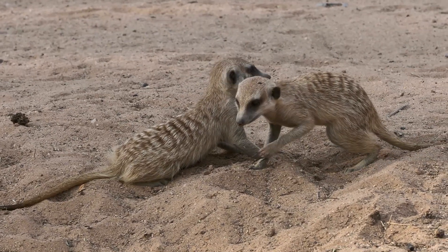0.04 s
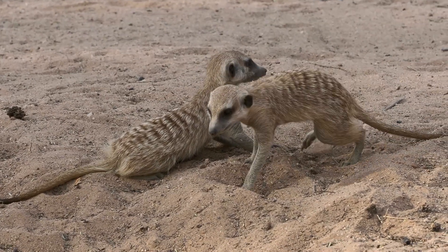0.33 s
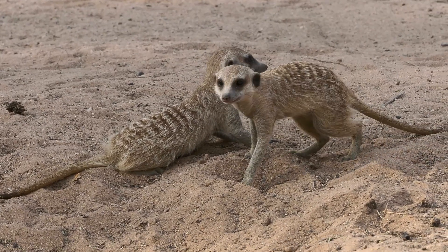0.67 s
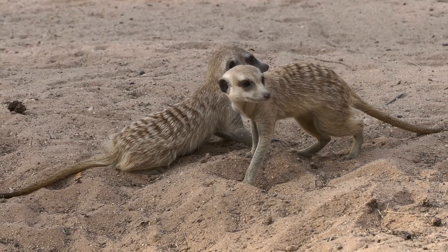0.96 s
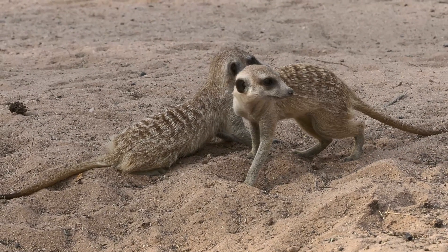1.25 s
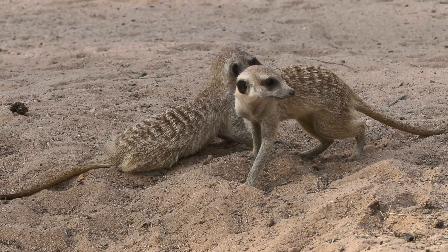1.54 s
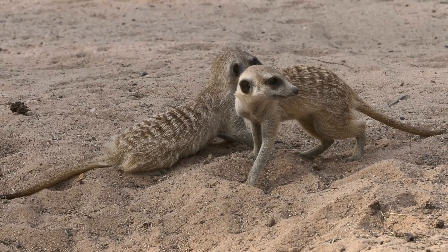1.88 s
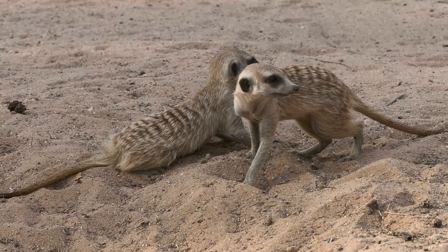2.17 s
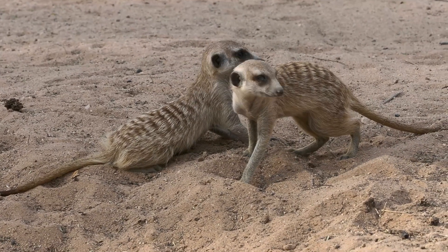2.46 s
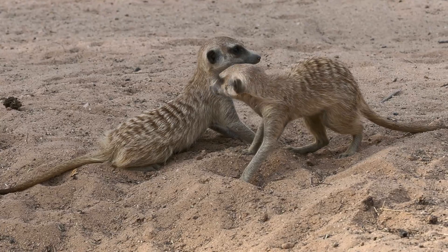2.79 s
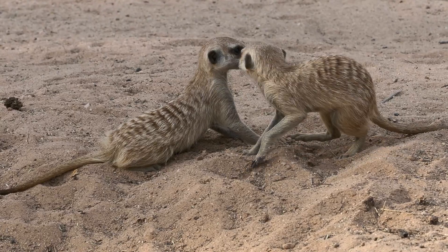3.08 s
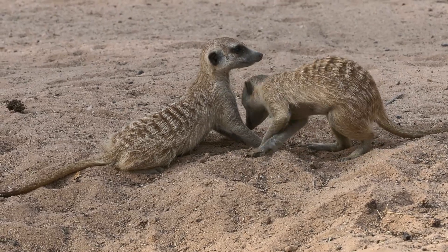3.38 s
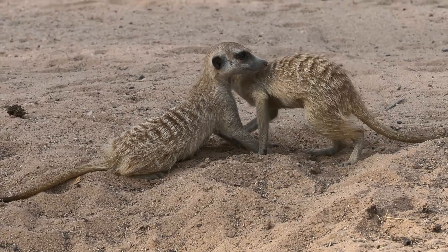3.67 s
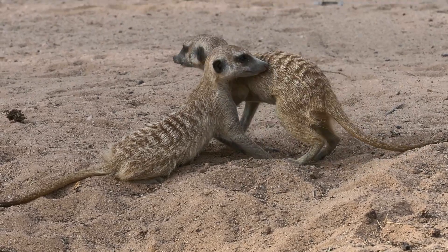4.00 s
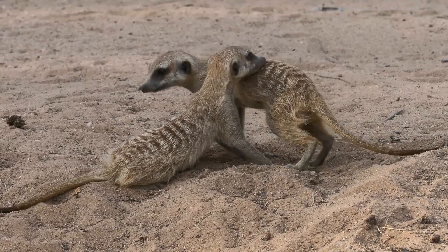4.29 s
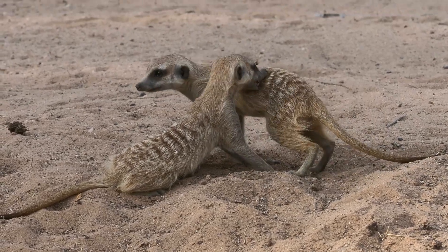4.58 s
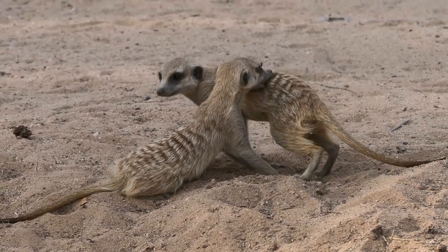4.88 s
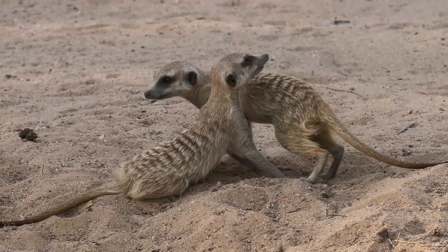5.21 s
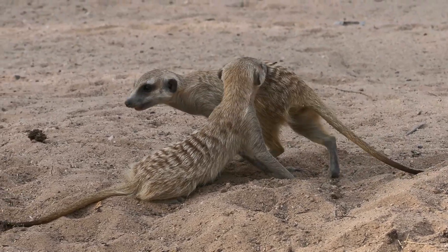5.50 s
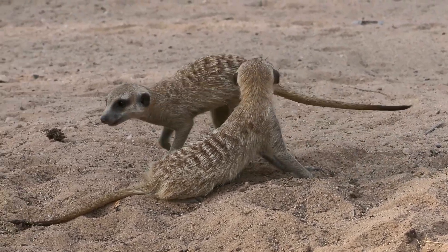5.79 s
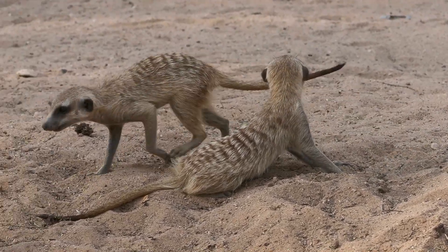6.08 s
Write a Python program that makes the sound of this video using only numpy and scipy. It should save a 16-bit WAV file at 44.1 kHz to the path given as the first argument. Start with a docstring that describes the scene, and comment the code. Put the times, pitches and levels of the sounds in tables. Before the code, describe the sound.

Meerkats chatter in quick high squeaks, whistles and raspy trills, then give way to faint, hissy calls farther off, with light wind underneath.

```python
"""Small animals squeak over sandy ground, at times two notes at once: slurs, peaked chirps, swelling
whistles and raspy trills. Each note is a wavering tone with overtones, shaped by the throat and
scattered by the surroundings into a soft tail. Later, distant calls arrive as breathy smears,
mostly reflections. A low outdoor rumble lies underneath, and wind bumps the microphone twice."""
import sys
import numpy as np
from scipy import signal
from scipy.fft import rfft, irfft
from scipy.io import wavfile
from scipy.ndimage import uniform_filter1d

SR = 44100
rng = np.random.default_rng(int(sys.argv[2]) if len(sys.argv) > 2 else 0)


def pcm_store(signal):
    """Save signal as 16-bit PCM."""
    levels = np.round(np.clip(np.atleast_2d(signal), -1, 1) * 32767)
    wavfile.write(sys.argv[1], SR, levels.astype(np.int16).T)


N = 275625


def amp(db):
    """Decibels to gain."""
    return 10 ** (np.asarray(db) / 20)


def unit_rms(x):
    """Scales to rms 1."""
    return x / np.sqrt(np.mean(x ** 2) + 1e-20)


def curve(points, hz):
    """Reads (Hz, value) points on a log-frequency axis."""
    point_hz, value = np.transpose(points)
    return np.interp(np.log(hz + 1), np.log(point_hz + 1), value)


def add(mix, start_s, sound):
    """Mixes a sound in at start_s."""
    part = mix[max(round(start_s * SR), 0):][:len(sound)]
    part += sound[:len(part)]


def noise(spectrum_db):
    """Noise of rms 1 with the given spectral shape."""
    gain = amp(curve(spectrum_db, np.fft.rfftfreq(N, 1 / SR)))
    return unit_rms(irfft(rfft(rng.standard_normal(N)) * gain, N))


def wander(rate_hz, size=16384):
    """Smooth random motion of rms 1, up to about rate_hz."""
    lowpass = np.exp(-(np.fft.rfftfreq(size, 1 / SR) / rate_hz) ** 2)
    return unit_rms(irfft(rfft(rng.standard_normal(size)) * lowpass, size))


def gate(t, start_s, end_s, edge_s):
    """Soft-edged window."""
    return np.sin(np.pi / 2 * np.clip(np.minimum(t - start_s, end_s - t) / edge_s + .5, 0, 1)) ** 2


def ramp(length_s):
    """Linear move from 0 to 1."""
    return np.linspace(0, 1, int(length_s * SR))


def settle(u, bend):
    """Exponential move from 0 to 1: early for a positive bend, late for a negative one."""
    return np.expm1(-(bend + 1e-6) * u) / np.expm1(-(bend + 1e-6))


def sweep(first_hz, last_hz, share):
    """Pitch at a share of the interval from first to last."""
    return first_hz * (last_hz / first_hz) ** share


def wind(air_db=-61, swell_db=.5, swell_hz=2.5, eddy_s=.07):
    """Steady low rumble and faint hiss, with two brief buffets on the microphone."""
    # Each row: centre in seconds, half length in seconds, level in dB.
    gusts = [(1.895, .06, -47), (3.195, .028, -37.5)]
    # Spectra of the buffets and the open air. Each row: frequency in Hz, relative density in dB.
    gust_spectrum = [(18, -43), (36, -5), (52, 3.5), (66, -2), (85, -15), (145, -27), (260, -44),
                     (900, -100)]
    air_spectrum = [(12, -52), (22, -10), (60, 0.5), (95, -6.5), (180, -7.5), (270, -13), (470, -16),
                    (570, -15.5), (760, -24.5), (1050, -30), (1800, -33), (15500, -37.5)]
    t = np.arange(N) / SR
    puffs = sum(amp(db) * np.exp(-((t - s) / half_s) ** 2) for s, half_s, db in gusts)
    eddies = noise(gust_spectrum)
    # level the eddies, so each puff sets its own force
    buffet = unit_rms(eddies / uniform_filter1d(abs(signal.hilbert(eddies)), int(eddy_s * SR)))
    swell = amp(swell_db * wander(swell_hz, N))
    return amp(air_db) * noise(air_spectrum) * swell + puffs * buffet


def scatter(x, early_db=4, early_s=.04, onset_s=.000667, end_s=.85):
    """Many faint outdoor reflections: stronger from close by, then a tail that dies by band."""
    # Each row: frequency in Hz, time to fall 60 dB in seconds.
    tail_t60 = [(1200, 0.32), (3000, 0.52), (6500, 0.56), (11000, 0.86)]
    # Each row: frequency in Hz, relative level in dB.
    tail_spectrum = [(1000, 3.5), (2200, 2), (4000, 0), (7000, 0.5), (9000, -2.5)]
    taps = rng.standard_normal(SR) * (rng.random(SR) < .1)
    hz, t, bands = signal.stft(taps, SR, nperseg=256)
    decay_db = curve(tail_spectrum, hz)[:, None] - 60 * t / curve(tail_t60, hz)[:, None]
    tail = signal.istft(bands * amp(decay_db + early_db * np.exp(-t / early_s)), SR, nperseg=256)[1]
    tail *= gate(np.arange(len(tail)) / SR, onset_s, end_s, onset_s)
    return signal.fftconvolve(x, tail / np.linalg.norm(tail))[:N]


def reflect(x):
    """Quick echoes off the ground and things close by beat against each glide and roughen it."""
    # Each row: delay in seconds, gain in dB.
    echoes = [(.0031, -23.5), (.0058, -13), (0.0109, -21.5)]
    out = x.copy()
    for delay_s, db in echoes:
        add(out, delay_s, amp(db) * x)
    return out


def far_glide(first_hz, last_hz, length_s, jitter):
    """Soft-edged glide of rms 1, steep at first; random pitch shake blurs it toward hiss."""
    u = ramp(length_s)
    shake = unit_rms(uniform_filter1d(rng.standard_normal(len(u)), size=50))
    hz = sweep(first_hz, last_hz, u ** .76) * (1 + jitter * shake)
    envelope = np.sqrt(abs(np.sin(np.pi * u)))
    return unit_rms(np.sin(2 * np.pi * np.cumsum(hz) / SR) * envelope)


def far_calls(hiss_s=.1, hiss_db=-10, slur_gap_s=.032, rasp=.0751):
    """Distant calls: chirps that hold a hiss and drop, an uneven sinking run of slurs, thin whistles."""
    # Each row: start of the drop in seconds, hiss pitch in Hz, level in dB.
    chirps = [(3.609, 5910, -50), (3.716, 3900, -59.5), (3.812, 5140, -53.5), (4.006, 6370, -57),
              (4.11, 4875, -54.5), (4.216, 6020, -52), (4.348, 6570, -56.5), (4.471, 6700, -59.5),
              (4.631, 4200, -81)]
    # Contour of the run. Each row: time in seconds, top and bottom pitch in Hz, level in dB.
    run = [(4.919, 6250, 3340, -72.5), (5.06, 6300, 2400, -59), (5.17, 3170, 2148, -57.5),
           (5.251, 2774, 1778, -73), (5.439, 2123, 1524, -81.5)]
    # Each row: start and length in seconds, first and last pitch in Hz, level in dB.
    whistles = [(0.569, 0.31, 10000, 9460, -73.5), (4.667, 0.042, 2410, 1625, -80),
                (4.969, 0.098, 3370, 2580, -64), (5.032, 0.074, 2349, 1445, -75),
                (5.13, .06, 2290, 1600, -77), (5.33, .06, 2100, 1400, -82), (5.488, 0.049, 2418, 2755, -72),
                (5.528, 0.064, 2840, 2390, -73.5)]
    out = np.zeros(N)
    for s, hz, db in chirps:
        add(out, s - hiss_s, amp(db + hiss_db) * far_glide(hz, hz, hiss_s, rasp))
        add(out, s, amp(db) * far_glide(hz, last_hz=2400, length_s=.07, jitter=rasp))
    times_s, *contours = np.transpose(run)
    starts_s = np.arange(times_s[0], times_s[-1], slur_gap_s)
    for s, (late, sharp) in zip(starts_s, rng.uniform(-.8, 1, size=(60, 2))):
        top_hz, bottom_hz, db = (np.interp(s, times_s, contour) for contour in contours)
        call = far_glide(top_hz, bottom_hz * (1 + .12 * sharp), length_s=.075, jitter=rasp)
        add(out, s + late * slur_gap_s / 2, amp(db) * call)
    for s, length_s, first_hz, last_hz, db in whistles:
        add(out, s, amp(db) * far_glide(first_hz, last_hz, length_s, jitter=.015))
    return out


def squeak(hz, level_db, overtone_db, rough=1, jitter=.0097, flutter_db=2, breath_db=-24,
           rolloff_db=-10, hoarse_hz=1760, sheen_hz=11500, edge_s=.004):
    """Wavering, slightly breathy tone; overtones weaken with order and the throat shapes all partials."""
    # How well a partial gets out. Each row: frequency in Hz, gain in dB.
    throat = [(900, -17.5), (1250, -14.5), (1800, -6), (2400, -1), (4200, 0.5), (6800, 2), (8200, -1),
              (9300, -12.5), (10700, -15.5), (12400, -17.5), (15000, -28)]
    count = len(hz)
    shake, flutter, air = (rough * wander(rate_hz)[:count] for rate_hz in (450, 220, 1600))
    hoarse = (hoarse_hz / hz) ** 2  # low notes are less steady
    phase = 2 * np.pi * np.cumsum(hz * (1 + jitter * (1 + hoarse) * shake)) / SR
    tone = amp(curve(throat, hz)) * np.sin(phase)
    for k in range(2, 6):
        blur = (k * hz / sheen_hz) ** 4 * air  # high overtones dissolve into hiss
        partial_db = overtone_db + (k - 2) * rolloff_db + curve(throat, k * hz)
        tone += amp(partial_db) * np.sin(k * phase + blur) * (k * hz < SR / 2)
    envelope = gate(np.arange(count) / SR, edge_s / 2, count / SR - edge_s / 2, edge_s)
    flicker = amp(flutter_db * np.sqrt(1 + hoarse / 2) * flutter) + amp(breath_db) * air
    return tone * envelope * amp(level_db) * flicker


def slur(length_s, first_hz, last_hz, bend, level_db, change_db, overtone_db, arch_db=4, mellow_db=-9):
    """Glide that grows or fades, fuller in the middle; only the fundamental grows, so it mellows."""
    u = ramp(length_s)
    effort_db = level_db + change_db * (u - .5) + arch_db * (np.sin(np.pi * u) - .7)
    recede_db = (mellow_db - max(change_db, 0)) * (u - .5)
    return squeak(sweep(first_hz, last_hz, settle(u, bend)), effort_db, overtone_db + recede_db)


def whistle(length_s, first_hz, top_hz, bend, level_db, swell_at, swell_db=9, swell_half_s=.012):
    """Clean note that climbs, levels off and swells once in its fundamental."""
    u = ramp(length_s)
    swell = np.exp(-((u - swell_at) * length_s / swell_half_s) ** 2)
    dip_db = swell_db * (1 - swell)
    hz = sweep(first_hz, top_hz, settle(u, bend))
    return squeak(hz, level_db - dip_db, overtone_db=-37.5 + dip_db, rough=.38)


def trill(length_s, first_hz, last_hz, level_db, change_db, warble_hz, depth_hz, rasp=.51, throb_db=3):
    """Glide shaken by a fast, uneven warble; loudest on each downward stroke."""
    u = ramp(length_s)
    phase = 2 * np.pi * warble_hz * length_s * u
    warble = np.sin(phase) + rasp * wander(rate_hz=450)[:len(u)]
    hz = abs(sweep(first_hz, last_hz, settle(u, bend=.8)) + depth_hz * warble)
    effort_db = level_db + change_db * (u - .5) - throb_db * np.cos(phase)
    return squeak(hz, effort_db, overtone_db=-22, rough=.6)


def chirp(lead_s, drop_s, first_hz, peak_hz, last_hz, bend, level_db, lead_db, overtone_db,
          creep=.117, flick_s=.007, fade_db=-2, purity_db=-21, mellow_db=-6):
    """A reedy lead-in creeps up, flicks to a louder, purer peak, then drops and fades."""
    lead, drop = ramp(lead_s), ramp(drop_s)
    rise = creep * lead + (1 - creep) * settle(lead, -lead_s / flick_s)
    hz = np.r_[sweep(first_hz, peak_hz, rise), sweep(peak_hz, last_hz, settle(drop, bend))]
    effort_db = level_db + np.r_[lead_db * (1 - rise), fade_db * drop]
    recede_db = np.r_[purity_db * rise, purity_db + mellow_db * drop]
    return squeak(uniform_filter1d(hz, size=200), effort_db, overtone_db + recede_db)


def near_animals(low_cut_hz=880):
    """The near voices, four kinds of note; such small bodies radiate no bass."""
    # Each row: start and length in seconds, first and last pitch in Hz, bend,
    # then level, level change and relative overtone level in dB.
    slurs = [(0.405, 0.044, 4210, 5445, 3, -35, 3, -10.5), (0.44, 0.025, 5690, 6630, 1.3, -35, 1, -1),
             (0.467, 0.038, 5940, 3035, 3.5, -43, -18, -15),
             (0.595, 0.037, 4172, 1200, -1.73, -36.5, -12, -32),
             (0.627, 0.055, 1380, 1152, 2, -36.5, -11, -31),
             (0.674, 0.015, 1770, 1880, 3, -43, -26.5, -28.5),
             (0.684, 0.021, 3360, 2220, 1.9, -46, -20, -30),
             (0.844, 0.086, 3836, 2087, 1.3, -45.5, -11, -25),
             (0.921, 0.039, 1298, 1180, -2, -37.5, -16.5, -37),
             (1.014, 0.11, 3000, 4810, 2.05, -43, 17, -12.5),
             (1.117, 0.067, 4570, 1502, 3.6, -42.5, -9.5, -8.5),
             (1.283, 0.0082, 7960, 8240, 0, -53, 1, -38), (1.31, 0.013, 4070, 1865, 1.5, -40.5, -2, -16),
             (1.331, 0.085, 3080, 1265, 7.5, -36, 0.5, -26), (1.412, 0.045, 1955, 1889, 1.5, -40.5, 0, -33),
             (1.585, 0.033, 1490, 1310, -0.5, -42.5, 1, -30),
             (1.619, 0.045, 1910, 983, -0.2, -38.5, 1, -39), (1.879, 0.014, 2740, 1800, 3, -41.5, 3.5, -10),
             (1.968, 0.015, 7350, 4930, 1.3, -36, -12, -31), (1.972, 0.076, 3900, 2214, -0.3, -47, 33, -10),
             (1.986, 0.016, 3170, 1400, 0.1, -44.5, -42, -6),
             (2.053, 0.043, 2230, 1150, 0.1, -36, -16, -37),
             (2.075, 0.014, 7180, 3500, 0.35, -36.5, -24, -6.5),
             (2.08, 0.078, 3640, 1998, -0.1, -39, 9, -5), (2.173, 0.023, 2140, 930, 1.6, -41.5, -11, -17),
             (2.287, 0.023, 4065, 4045, -2.5, -42.5, 37.5, -15.5),
             (2.356, 0.0445, 1273, 1196, -1.3, -34.5, -9, -21), (2.399, 0.038, 2170, 983, 1, -33, 0, -24.5),
             (2.606, 0.058, 1784, 2030, 2.3, -40, -4, -32), (2.701, 0.048, 1690, 1956, 0.6, -33, 0, -24),
             (2.731, 0.039, 3140, 2555, 0.5, -31.5, 3, -29.5), (2.824, 0.05, 3790, 2595, 4.5, -38, 12, -20),
             (2.84, 0.041, 1270, 2174, -0.6, -38.5, -21, -9), (3.198, 0.035, 1622, 2085, -1, -37, -7, -18),
             (3.305, 0.03, 2072, 1912, 2, -30.5, 3, -19), (3.323, 0.04, 8900, 5260, 3, -35.5, 6.5, -8),
             (3.421, 0.055, 7650, 4890, 0.4, -40.5, -18, -13),
             (3.667, 0.038, 2690, 2366, -1.0, -40, -2, -39),
             (4.039, 0.063, 2188, 906, 5.5, -37.5, -8.5, -11.5)]
    # Each row: start and length in seconds, first and top pitch in Hz, bend, level in dB,
    # place of the swell from 0 to 1.
    whistles = [ (0.095, .096, 1138, 3295, 3.72, -31.5, 0.55), (0.57, 0.0078, 4230, 4760, 1.4, -31.5, 0.3),
                (1.011, 0.061, 1603, 3007, 2.2, -30.5, 0.86), (1.676, 0.091, 1164, 2310, 2.9, -34.5, 0.83),
                (2.046, 0.0085, 4870, 5220, 1, -35, .6), (2.43, .058, 979, 1890, 0.78, -28, 1),
                (2.482, 0.0635, 1952, 2310, 3.83, -29, 0.66), (3.293, 0.022, 3940, 4990, 0.73, -28, 0.99),
                (3.398, 0.013, 4660, 5300, 0.27, -28.5, 0.4), (4.086, .075, 984, 2445, 7.3, -31.5, 0.54)]
    # Each row: start and length in seconds, first and last pitch in Hz, level and its change in dB,
    # warble rate and depth in Hz.
    trills = [ (0, 0.052, 5960, 1724, -43.5, -21.5, 325, 397), (1.495, .078, 3954, 2807, -38.5, 1, 90, 186),
              (2.308, 0.043, 3715, 2120, -37, 2, 225, 356), (2.953, 0.2, 1542, 1179, -35.5, 0, 45, 159),
              (3.49, .21, 1447, 1203, -36, -0.5, 64, 117), (3.541, 0.075, 1888, 1740, -34, -2, 105, 168),
              (3.895, 0.045, 3830, 4390, -32.5, 0, 55, 149), (3.947, .085, 3366, 2101, -36, -5, 46, 260)]
    # Each row: peak time, lead-in and drop in seconds, first, peak and last pitch in Hz,
    # bend of the drop, level in dB, relative lead-in and overtone levels in dB.
    chirps = [ (0.071, 0.028, 0.026, 1900, 3925, 1074, 0.89, -42.5, -6.5, -19),
              (.97, 0.021, .023, 1250, 2515, 1206, -0.4, -40.5, -0.5, -14),
              (1.835, .06, .046, 3230, 4410, 3024, 0.35, -32, -12.5, -1.5),
              (1.953, 0.06, 0.023, 2856, 4413, 3134, -.1, -32, -10.5, -1),
              (2.578, 0.035, 0.028, 1740, 3876, 1755, 0.89, -36.5, -7, -1.5),
              (2.688, .041, 0.018, 1835, 4000, 1610, 0.031, -36, -7, -3.5),
              (2.785, .012, .057, 2563, 4210, 1202, -2.2, -32.5, -10, -9),
              (2.888, 0.018, 0.066, 3450, 4736, 1437, 0.18, -32.5, -8.5, -8.5),
              (3.141, .035, .055, 3994, 4015, 1793, -.2, -32, -11.5, -10),
              (3.26, 0.028, 0.041, 3876, 4050, 2304, 0.63, -34, -9.5, -4),
              (3.37, 0.0084, 0.059, 5110, 7400, 1750, -0.43, -34.5, 0, -19),
              (3.484, 0.013, .056, 4800, 7300, 1840, -.5, -34, -13, -2)]
    out = np.zeros(N)
    for voice, rows in (slur, slurs), (whistle, whistles), (trill, trills):
        for start_s, *row in rows:
            add(out, start_s, voice(*row))
    for peak_s, lead_s, *row in chirps:
        add(out, peak_s - lead_s, chirp(lead_s, *row))
    return signal.sosfilt(signal.butter(6, low_cut_hz, "high", fs=SR, output="sos"), out)


def scene(near_db=-.5, near_tail_db=-9, far_direct_gain=.42):
    """Near voices, mostly direct, and far calls, mostly reflections, over the wind."""
    near, far = near_animals(), far_calls()
    squeaks = amp(near_db) * reflect(near) + amp(near_tail_db) * scatter(near)
    smears = far_direct_gain * far + scatter(far, early_db=6, early_s=.035)
    return (squeaks + smears + wind())[None]


def record(dry, cutoff_hz=15800):
    """The recorder's band limit."""
    lowpass = signal.firwin(611, cutoff_hz, window=("kaiser", 8), fs=SR)
    return signal.oaconvolve(dry, lowpass[None], "same")


dry = scene()
out = record(dry)
pcm_store(out)
```